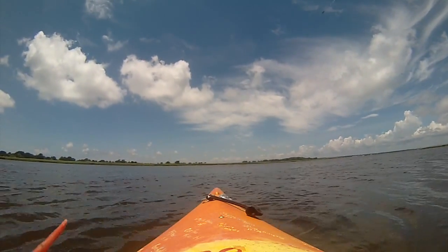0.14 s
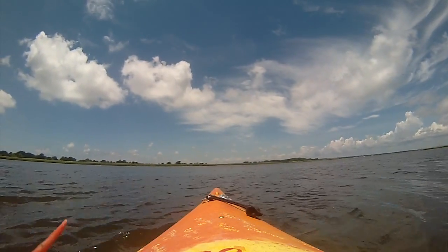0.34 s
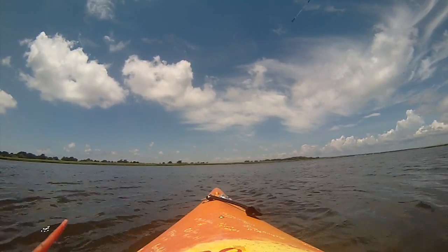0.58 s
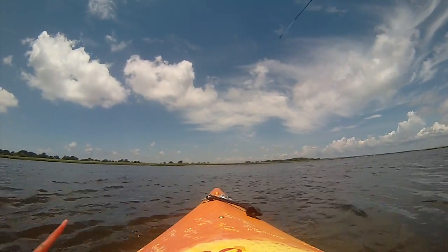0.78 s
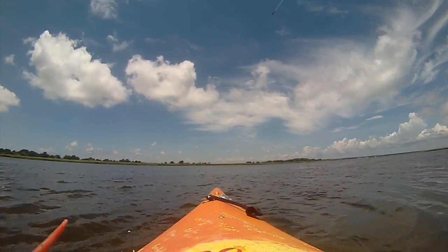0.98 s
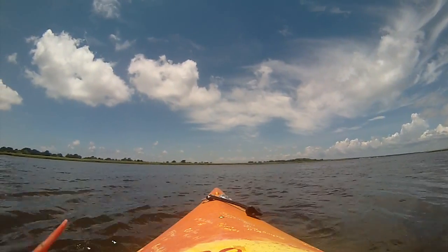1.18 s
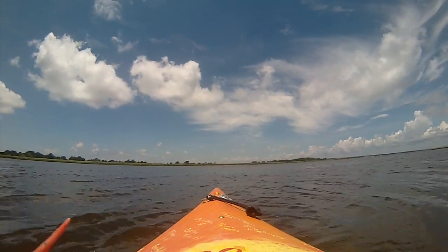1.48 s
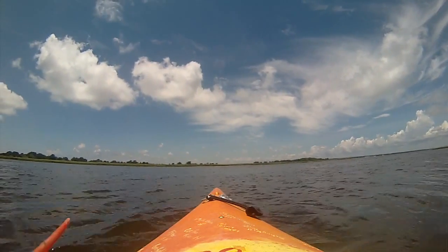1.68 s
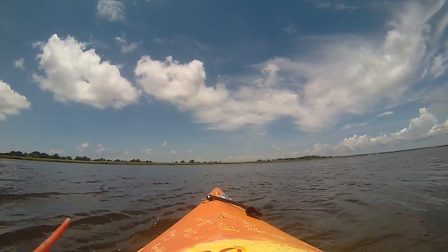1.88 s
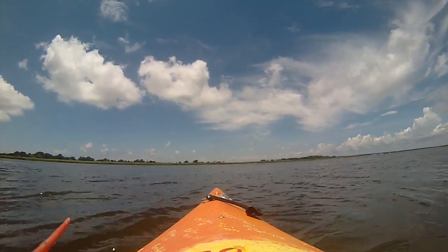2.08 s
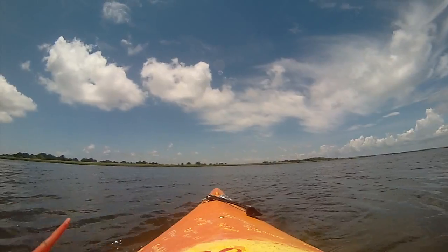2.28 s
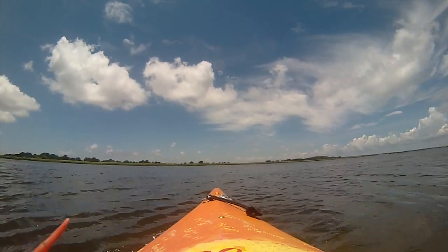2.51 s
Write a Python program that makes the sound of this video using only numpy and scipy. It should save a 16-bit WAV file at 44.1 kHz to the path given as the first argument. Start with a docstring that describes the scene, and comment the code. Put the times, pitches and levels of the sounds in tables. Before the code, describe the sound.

Water laps and drips around a drifting kayak's hull while wind buffets the microphone.

```python
"""Small waves plink, gulp and lap against a drifting kayak, heard from its deck on open water.
Falling drops trap bubbles that resonate as they rise, air pockets gulp under the hull,
wavelets knock its damped modes into vibration, and ripples wash along it as clouds of tiny bubbles.
Behind them wind rumbles on the microphone; the recorder adds hiss and faint images around a high carrier."""
import sys
import numpy as np
from scipy import signal
from scipy.fft import rfft, irfft, next_fast_len
from scipy.io import wavfile

SR = 44100
rng = np.random.default_rng(int(sys.argv[2]) if len(sys.argv) > 2 else 0)


def bounce(signal):
    """Save signal as a 16-bit WAV file at the path given by the first command-line argument."""
    frames = np.transpose(np.atleast_2d(signal))
    limited = np.clip(frames, -1, 1)
    pcm = np.round(limited * 32767).astype(np.int16)
    wavfile.write(sys.argv[1], SR, pcm)


N = 116865

# Drops trapping a bubble: t/s, f/Hz, level/dB, length/s, last f / first f, glide exponent, tick/dB re bubble
DROPS = [(.050, 835, -31.5, 0.04, 2.14, 2.53, -22), (.157, 1724, -38.5, 0.024, 1.87, 2.26, -16),
         (0.226, 2800, -50.5, 0.0041, 1.47, 0.94, -6), (.270, 2350, -62, .014, 0.95, 1.1, -20),
         (.614, 2850, -46, 0.0089, 1.06, 1.4, -10), (0.633, 1700, -47.5, .014, 0.98, 1.1, -18),
         (0.635, 2450, -52, 0.01, 1.1, 1.1, -13), (0.753, 4930, -57.5, .005, 1.06, 1.1, -20),
         (0.808, 2280, -41.5, 0.0076, 1.08, 1.1, -7), (0.814, 2880, -52.5, 0.008, 0.88, 1.3, -6),
         (0.909, 2470, -57, 0.016, 0.97, 1.1, -16), (.969, 2760, -49, 0.0085, 0.97, 1.1, -14),
         (0.978, 1610, -56.5, 0.044, 1.05, 0.95, -20), (.999, 847, -33.5, .036, 1.55, 1.7, -28),
         (1.000, 1820, -52.5, 0.038, 1.28, 1.6, -16), (1.074, 1790, -53.5, 0.015, 1.05, 1.1, -17),
         (1.238, 1940, -55, 0.02, 1.5, 1.26, -5), (1.262, 2900, -44, 0.0062, 1, 0.95, -17),
         (1.291, 4730, -56, .005, 1.05, 1.1, 3), (1.319, 3100, -50, 0.0068, 0.88, 1.4, -3),
         (1.358, 5000, -59, .005, 1.03, 1.1, -12), (1.495, 1600, -53.5, 0.0082, 1.34, 1.1, -12),
         (1.565, 1072, -45, 0.046, 1.6, 1.7, -11), (1.642, 1650, -49, 0.023, 1.5, 1.4, -16),
         (1.806, 1764, -39.5, 0.011, 1.14, 1.15, -17), (2.009, 1320, -37, 0.037, 1.74, 2.14, -18.5),
         (2.091, 2006, -51, 0.015, 1.66, 1.6, -14), (2.163, 2610, -44, 0.011, 1, 1.7, -11.5),
         (2.489, 1367, -43.5, .045, 2.43, 3.4, -11), (2.570, 3050, -54, 0.012, .95, 1.1, -12),
         (2.599, 2280, -47, 0.0047, 1.23, 1.5, -4)]
DROP_FADE_DB, DROP_FADE_POWER, DROP_ATTACK_S, DROP_RELEASE_SHARE = -21.5, 0.78, 0.00052, 0.073
DROP_WAVER, DROP_WAVER_HZ, TICK_DECAY_S = 0.23, 140, 0.0033
# Spectrum of a drop striking the surface: f/Hz, relative density/dB
TICK_SPECTRUM = [(200, -22), (800, -7), (2200, 5), (3400, -2.5), (4500, -14), (7000, -12), (12000, -28)]

# Air squeezed between wave and hull: t/s, f/Hz, level/dB, length/s, last f / first f, splash/dB re tone
AIR_POCKETS = [(0.331, 792, -41, 0.034, 0.73, -5.5), (0.36, 1012, -46, 0.026, 0.97, 0.5),
               (0.487, 896, -46, 0.012, .9, 2), (.559, 746, -34.5, .006, 0.7, -8),
               (.785, 860, -45.5, .014, .9, 3), (1.062, 507, -39.5, 0.0085, 0.72, -10),
               (1.125, 616, -40, 0.01, 0.96, -13), (1.137, 1610, -39, .010, 0.81, 5.5),
               (1.1396, 1104, -37, 0.029, 0.77, -8), (1.147, 745, -37.5, 0.0095, 1.22, -6),
               (1.254, 831, -42.5, 0.0386, 0.87, 3), (1.274, 863, -31, 0.015, 0.77, -33),
               (1.277, 550, -37.5, 0.016, 0.94, -19), (1.295, 707, -49, 0.019, 0.63, 3.5),
               (1.314, 2290, -48.5, 0.02, 1.02, 1), (1.326, 1890, -56, .016, 1.14, 2),
               (1.347, 817, -38, 0.027, 0.834, -16), (1.725, 655, -47.5, 0.021, 1.22, -0.5),
               (1.82, 720, -45, 0.0073, 1.6, -6), (1.891, 784, -42.5, 0.0075, 0.5, -3),
               (1.920, 890, -34, 0.0064, 0.93, -17), (2.329, 740, -49, 0.0078, 0.91, -13),
               (2.333, 877, -36.5, 0.018, 0.95, -18.5), (2.353, 820, -42.5, 0.029, 0.75, -31),
               (2.568, 920, -52, 0.012, 0.99, 0)]
GULP_ATTACK_SHARE, GULP_RELEASE_SHARE, GULP_FADE_DB = 0.2, 0.28, -7
GULP_ROUGHNESS, GULP_FLUTTER_HZ = 0.33, 170
# Spectrum of the splash around a pocket: f/Hz, relative density/dB
SPLASH_SPECTRUM = [(150, -71), (450, 2), (900, 4.5), (1500, -7), (2500, -15.5), (4000, -33), (6000, -34.5)]

# Wavelets striking the hull: t/s, level/dB
HULL_BLOWS = [(.207, -43), (.311, -32), (0.429, -37), (.446, -33), (.470, -31.5), (0.535, -28.5),
              (.643, -38.5), (.775, -51), (1.142, -28.5), (1.264, -32.5), (1.461, -29.5), (1.492, -38),
              (1.525, -33.5), (1.554, -38), (1.608, -35), (1.663, -33.5), (1.750, -31.5), (1.840, -27.5),
              (1.920, -39), (2.194, -32.5), (2.286, -34.5)]
BLOW_ATTACK_S, MODE_DETUNE = 0.00081, 0.093
# Modes of the hull: f/Hz, level/dB re blow, 60 dB decay time/s
HULL_MODES = [(80.7, 4, 0.086), (150.8, -2.5, 0.13), (220, -6, 0.049), (386, -8, 0.034), (576, -12, 0.038)]

# Envelope of the ripples along the hull: t/s, level/dB
WASH_ENVELOPE = [(0, -43.5), (.12, -52), (.15, -55), (.19, -50.5), (.28, -54), (.36, -52.5), (.52, -47.5),
                 (.63, -50.5), (.72, -46), (.81, -47), (.88, -62.5), (.93, -55), (1.06, -59.5), (1.10, -57),
                 (1.22, -54.5), (1.30, -46), (1.40, -59.5), (1.47, -54.5), (1.62, -52), (1.73, -46.5),
                 (1.83, -44.5), (1.93, -47), (2.02, -52.5), (2.12, -53.5), (2.20, -54), (2.31, -58),
                 (2.43, -62.5), (2.47, -73), (2.51, -56), (2.65, -65)]
BUBBLES_PER_S, BUBBLE_SPREAD_DB, BUBBLE_DECAY_CYCLES, RUSH_GAIN = 1000, 3.5, 3.13, 0.38
# Spectral weighting of the ripples: f/Hz, relative gain/dB
WASH_SPECTRUM = [(100, -34), (250, -1.5), (450, 2.5), (750, -3), (1100, -11), (1700, -19), (2400, -27.5),
                 (3300, -37.5), (5500, -48)]

# Envelope of the gusts: t/s, level/dB
WIND_ENVELOPE = [(0, -34.5), (.24, -30), (.36, -33.5), (.53, -29.5), (.64, -37), (.72, -38.5), (.81, -31.5),
                 (.87, -41.5), (.93, -35), (1.2, -36.5), (1.35, -36.5), (1.5, -36), (1.6, -30.5),
                 (1.68, -36), (1.8, -28), (2.0, -34.5), (2.12, -36.5), (2.22, -33), (2.4, -37.5),
                 (2.49, -43), (2.53, -35), (2.65, -43)]
BUFFET_DB, BUFFET_HZ = 3, 22.8
# Spectrum of wind on the microphone: f/Hz, relative density/dB
WIND_SPECTRUM = [(10, -13.5), (28, 0.5), (50, 0.5), (85, -1), (125, -6.5), (200, -15), (320, -21.5),
                 (600, -43.5), (1500, -69.5), (5000, -68)]

# Frequency response of the recorder: f/Hz, gain/dB
RECORDER_RESPONSE = [(20, 0), (4000, 0), (5100, 1), (5900, -7), (7000, -0.5), (9000, 0), (12000, -36)]
# Spectrum of its hiss: f/Hz, relative density/dB
HISS_SPECTRUM = [(100, 15.5), (700, -2.5), (1500, 1.5), (3000, -2.5), (5000, -10), (6000, -18.5),
                 (7200, -14), (10000, -16), (15000, -21)]
HISS_DB, CARRIER_HZ, MIRROR_TRIM_DB, BAND_LIMIT_HZ = -68, 12000, 0.2, 15800


def amp(db):
    """Amplitude ratio of a level in decibels."""
    return 10 ** (np.asarray(db) / 20)


def unit(x):
    """Normalisation to rms 1."""
    return x / np.sqrt(np.mean(x ** 2) + 1e-20)


def envelope(points):
    """Gain at each sample, interpolated from rows of t/s, level/dB."""
    times, db = np.transpose(points)
    return amp(np.interp(np.arange(N) / SR, times, db))


def colour(x, points):
    """Zero-phase filtering by rows of f/Hz, gain/dB."""
    hz, db = np.transpose(points)
    size = next_fast_len(len(x) + 4096)
    f = np.fft.rfftfreq(size, 1 / SR)
    gain = amp(np.interp(np.log(f + 1), np.log(hz), db))
    return irfft(rfft(x, size) * gain, size)[:len(x)]


def noise(spectrum):
    """Spectrally shaped Gaussian noise of rms 1."""
    return unit(colour(rng.standard_normal(N), spectrum))


def wander(hz):
    """Random modulation of rms 1, low-passed at hz."""
    f = np.fft.rfftfreq(N, 1 / SR)
    return unit(irfft(rfft(rng.standard_normal(N)) / (1 + (f / hz) ** 4), N))


def add(mix, start, sound):
    """Superposition of a sound on the mix, from start in seconds."""
    part = mix[max(round(start * SR), 0):][:len(sound)]
    part += sound[:len(part)]


def gate(t, length, attack_s, release_share):
    """Trapezoidal envelope, released over the last share of its length."""
    return np.minimum(t / attack_s, 1) * np.clip((1 - t / length) / release_share, 0, 1)


def drops():
    """Bubble resonance: an impact ticks, then trapped air rings, mostly rising in pitch as it surfaces."""
    out, impact = np.zeros(N), noise(TICK_SPECTRUM)
    waver = DROP_WAVER * wander(DROP_WAVER_HZ)
    for start, hz, db, length, glide, lateness, tick_db in DROPS:
        t = np.arange(0, length, 1 / SR)
        progress, span = t / length, round(start * SR) + np.arange(len(t))
        pitch = hz * (1 + (glide - 1) * np.sin(np.pi / 2 * progress ** lateness))
        phase = 2 * np.pi * np.cumsum(pitch) / SR + waver[span]
        ring = (1 + waver[span] * progress) * np.sin(phase)
        ring *= amp(DROP_FADE_DB * progress ** DROP_FADE_POWER)
        ring *= gate(t, length, DROP_ATTACK_S, DROP_RELEASE_SHARE)
        tick = amp(tick_db) * impact[span] * np.exp(-t / TICK_DECAY_S)
        add(out, start, amp(db) * (ring + tick))
    return out


def gulps():
    """Cavity resonance: an air pocket rings roughly inside a short splash, mostly sinking in pitch."""
    out, spray = np.zeros(N), noise(SPLASH_SPECTRUM)
    flutter = GULP_ROUGHNESS * wander(GULP_FLUTTER_HZ)
    waver = GULP_ROUGHNESS * wander(GULP_FLUTTER_HZ)
    for start, hz, db, length, glide, splash_db in AIR_POCKETS:
        t = np.arange(0, length, 1 / SR)
        progress, span = t / length, round(start * SR) + np.arange(len(t))
        phase = 2 * np.pi * np.cumsum(hz * glide ** progress) / SR + waver[span]
        ring = (1 + flutter[span]) * np.sin(phase)
        splash = amp(splash_db) * spray[span] / np.sqrt(2)
        shape = gate(t, length, GULP_ATTACK_SHARE * length, GULP_RELEASE_SHARE)
        add(out, start, amp(db + GULP_FADE_DB * progress) * shape * (ring + splash))
    return out


def hull_bumps():
    """Modal vibration: soft blows of water ring the damped hull, a little differently at each spot."""
    out, t = np.zeros(N), np.arange(8192) / SR
    hz, mode_db, t60 = np.transpose(HULL_MODES)[:, :, None]
    decay = np.exp(-np.log(1000) * t / t60)
    for start, db in HULL_BLOWS:
        detuned = hz * (1 + MODE_DETUNE * rng.uniform(-1, 1, hz.shape))
        modes = amp(db + mode_db) * decay * np.sin(2 * np.pi * detuned * t)
        add(out, start, modes.sum(0) * np.minimum(t / BLOW_ATTACK_S, 1))
    return out


def wash():
    """Incoherent summation: tiny damped bubbles merge over a soft rush, swelling with each ripple."""
    t, cloud = np.arange(2048) / SR, np.zeros(N)
    pitches_hz = np.geomspace(280, 3800, 24)
    for hz in pitches_hz:
        births = rng.random(N) < BUBBLES_PER_S / len(pitches_hz) / SR
        strengths = amp(BUBBLE_SPREAD_DB * np.minimum(rng.exponential(1, N), 4))
        bubble = hz * np.sin(2 * np.pi * hz * t) * np.exp(-hz * t / BUBBLE_DECAY_CYCLES)
        cloud += signal.oaconvolve(births * strengths, bubble)[:N]
    bubbles = unit(colour(cloud, WASH_SPECTRUM))
    rush = RUSH_GAIN * noise(WASH_SPECTRUM)
    return envelope(WASH_ENVELOPE) * unit(bubbles + rush)


def wind():
    """Turbulent pressure: gusts buffet the microphone with a low, uneven rumble."""
    rumble = noise(WIND_SPECTRUM)
    buffeting = amp(BUFFET_DB * np.tanh(wander(BUFFET_HZ)))
    return envelope(WIND_ENVELOPE) * unit(rumble * buffeting)


def scene():
    """Superposition of water and wind at one microphone."""
    return (drops() + gulps() + hull_bumps() + wash() + wind())[None]


def record(dry):
    """Holding each sample at the carrier rate mirrors the dulled sound about the carrier; hiss and a band limit
    follow."""
    dulled = colour(dry[0], RECORDER_RESPONSE)
    # Differentiation weights each component by about f / carrier, so the sidebands are faint.
    slope = np.gradient(dulled) * SR / (2 * np.pi * CARRIER_HZ)
    sidebands = 2 * slope * np.sin(2 * np.pi * CARRIER_HZ * np.arange(N) / SR)
    mix = dulled + amp(MIRROR_TRIM_DB) * sidebands + amp(HISS_DB) * noise(HISS_SPECTRUM)
    lowpass = signal.firwin(511, BAND_LIMIT_HZ, window=("kaiser", 9), fs=SR)
    return signal.oaconvolve(mix, lowpass, "same")[None]


dry = scene()
out = record(dry)
bounce(out)
```